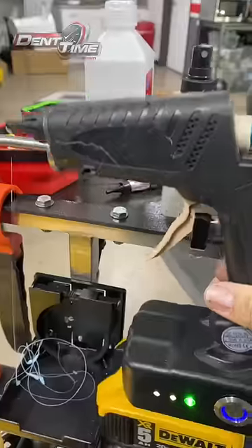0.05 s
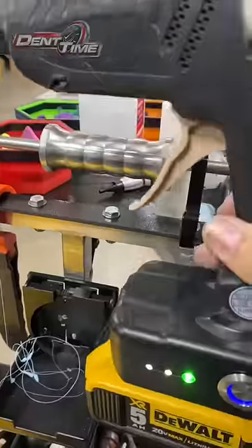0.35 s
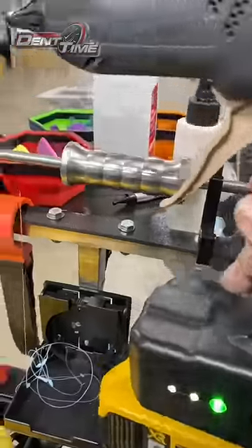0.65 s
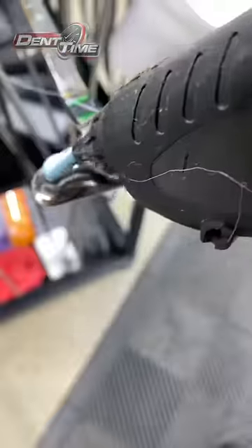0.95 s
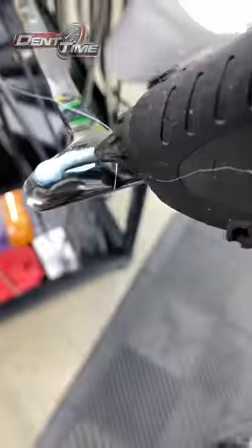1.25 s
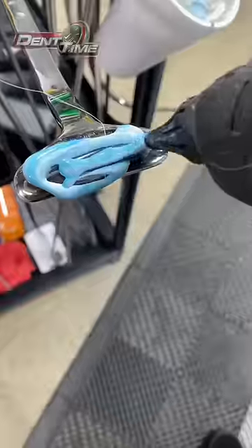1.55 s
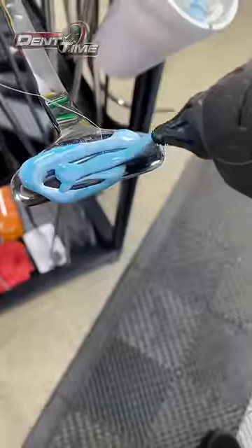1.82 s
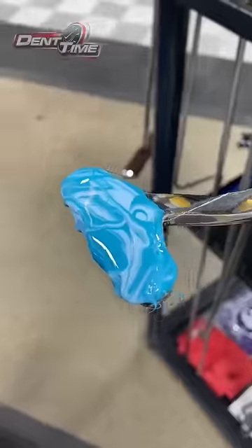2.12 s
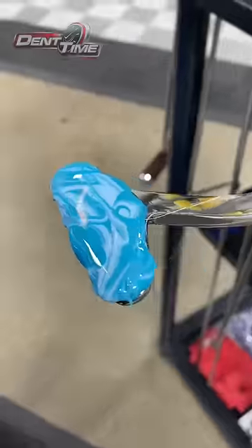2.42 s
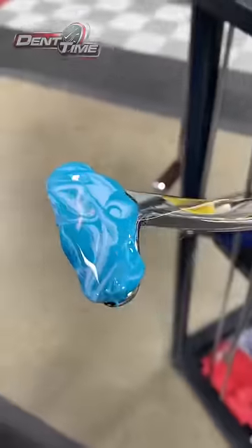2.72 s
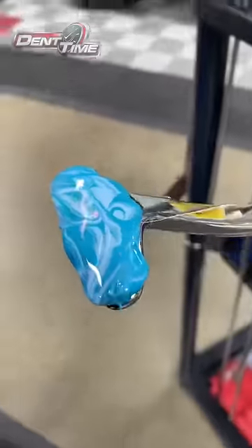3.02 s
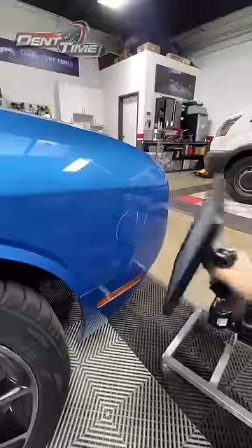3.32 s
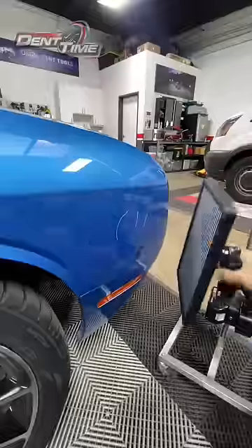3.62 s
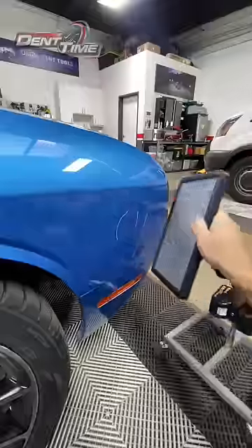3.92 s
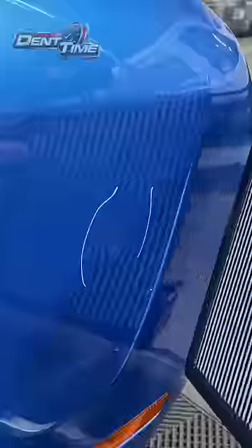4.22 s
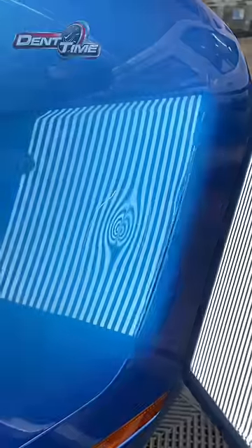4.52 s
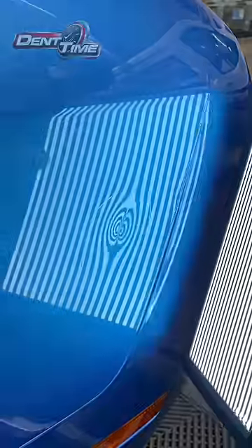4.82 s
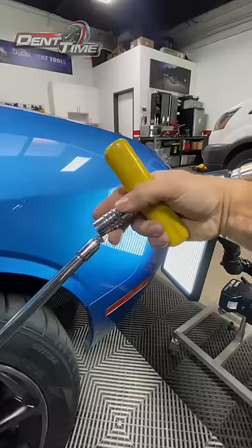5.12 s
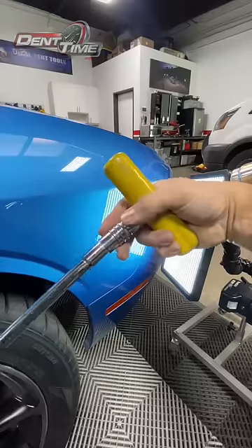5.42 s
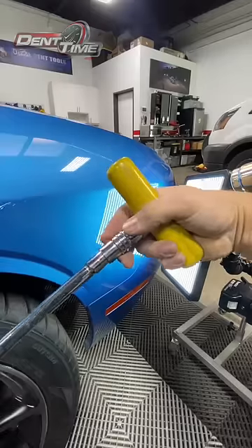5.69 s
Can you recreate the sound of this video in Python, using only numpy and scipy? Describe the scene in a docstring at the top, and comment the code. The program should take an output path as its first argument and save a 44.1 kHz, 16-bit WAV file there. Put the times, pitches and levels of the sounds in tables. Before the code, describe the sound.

A close, hollow knock and a few trigger ticks come from a plastic glue gun being handled, over the low rumble of a workshop hall. After a pause, a lamp stand is adjusted some way off, creaking, squeaking briefly and clacking as it settles. The hum then grows a little, and a steel ratchet handle near the microphone gives three loud, ringing snaps among lighter ticks.

```python
"""Dent repair in a humming workshop.

Ventilation and machines fill a large hall. Close to the microphone a glue gun is picked up and clicks.
Farther off, a lamp stand's stiff joint sticks and slips, creaking and squealing, and loose parts clack.
Then, close again, the pawl in a push rod's ratchet snaps through its notches and rings the steel handle."""
import sys
import numpy as np
from scipy import signal
from scipy.fft import rfft, irfft, next_fast_len
from scipy.io import wavfile
from scipy.ndimage import map_coordinates

SR = 44100
rng = np.random.default_rng(int(sys.argv[2]) if len(sys.argv) > 2 else 0)


def to_wav(s):
    """Save 16-bit WAV."""
    ch = np.atleast_2d(s).T  # columns
    pcm = np.round(np.clip(ch, -1, 1) * 32767)  # PCM
    wavfile.write(sys.argv[1], SR, pcm.astype(np.int16))


N = 262395
TIME = np.arange(N) / SR
AGE = np.arange(SR // 3) / SR  # seconds since a blow


def amp(db):
    """Decibels to gain."""
    return 10 ** (np.asarray(db) / 20)


def unit(x):
    """Scale to rms 1."""
    return x / np.sqrt(np.mean(x ** 2) + 1e-20)


def unit_energy(x):
    """Scale to energy 1."""
    return x / np.linalg.norm(x)


def along(points, hz):
    """Read (frequency [Hz], value) points on a log axis."""
    freqs, values = np.transpose(points)
    return np.interp(np.log(hz + 1), np.log(freqs + 1), values)


def curves(rows):
    """One value per sample for each column after the time."""
    times, *columns = np.transpose(rows)
    return [np.interp(TIME, times, column) for column in columns]


def fade(t, t60):
    """Exponential decay by 60 dB in t60 seconds."""
    return np.exp(-np.log(1000) * t / t60)


def gate(start, end, edge=.004):
    """On between two times, with soft edges."""
    return np.clip(np.minimum(TIME - start, end - TIME) / edge + .5, 0, 1)


def swells(rows):
    """Gain of smooth swells given as (time [s], half length [s], level [dB])."""
    return sum(amp(db) * np.exp(-((TIME - s) / width) ** 2) for s, width, db in rows)


def wobble(rate):
    """A smooth random curve, rate knots a second."""
    return map_coordinates(rng.standard_normal(1024), [TIME * rate], mode="wrap")


def noise(spectrum):
    """Coloured noise of rms 1."""
    size = next_fast_len(N)
    gain = amp(along(spectrum, np.fft.rfftfreq(size, 1 / SR)))
    return unit(irfft(rfft(rng.standard_normal(size)) * gain, size)[:N])


def through(x, response):
    """Convolve, keeping the length."""
    return signal.fftconvolve(x, response)[:len(x)]


def colour(x, spectrum, size=1024):
    """Causal filter with the given spectrum and unit energy."""
    gain = amp(along(spectrum, np.fft.rfftfreq(size, 1 / SR)))
    cepstrum = irfft(np.log(gain))
    cepstrum[1:size // 2] *= 2  # fold to minimum phase
    cepstrum[size // 2 + 1:] = 0
    return through(x, unit_energy(irfft(np.exp(rfft(cepstrum)))))


def high_pass(x, hz):
    """Roll off the bass below hz."""
    return signal.sosfilt(signal.butter(2, hz, "highpass", fs=SR, output="sos"), x)


def add(track, s, sound):
    """Mix a sound into the track at time s."""
    part = track[round(s * SR):][:len(sound)]
    part += sound[:len(part)]


def ring(modes, pitch=1, scatter_db=2):
    """One blow on a set of modes, their strengths scattered at random; peak 1."""
    hz, db, t60 = np.transpose(modes)[:, :, None]
    strength = amp(db + scatter_db * rng.standard_normal(hz.shape)) * rng.choice([-1, 1], hz.shape)
    ringing = np.sum(strength * np.sin(2 * np.pi * hz * pitch * AGE) * fade(AGE, t60), axis=0)
    return ringing / np.abs(ringing).max()


def crack(spectrum, t60):
    """A blow on countless close, quickly dying modes; peak about 1."""
    return colour(rng.standard_normal(len(AGE)) * fade(AGE, t60), spectrum) / 2


# Moments when the hall's tail stops short; the last two bound the drone: (time [s])
BREAKS = [0.775, 4.102, 5.04, 5.81]
# The rush of air sinks for a while: (time [s], relative level [dB])
AIR_LULL = [(0, 0.5), (4.3, 0), (4.6, -2.5), (5.0, -1), (5.3, -1.5), (5.95, 2)]
# Spectra of vent rumble, rushing air and the drone beside the car: (frequency [Hz], relative level [dB])
RUMBLE_SPECTRUM = [(25, -46), (38, -16.5), (54, -1.5), (81, 4.5), (115, 2.5), (150, -1.5), (227, -7),
                   (314, -10), (400, -16), (880, -55)]
AIR_SPECTRUM = [(90, -30), (160, -9.5), (270, -7), (400, -12.5), (630, -10), (1000, -11), (1550, -18.5),
                (2000, -27.5), (2600, -37.5), (3500, -41), (6000, -47), (11000, -53), (16000, -55)]
DRONE_SPECTRUM = [(30, -43), (48, -10), (107, 6.5), (162, -4), (270, -2), (380, -9), (480, 0.5),
                  (650, -17.5), (1200, -40.5)]
# Machine hum around the hall: (start [s], end [s], frequency [Hz], level [dB])
HUM_TONES = [(5.04, 5.81, 53.8, -38.5), (5.04, 5.813, 102.6, -33.5), (5.042, 5.527, 199.5, -39),
             (5.046, 5.272, 253, -41), (5.042, 5.24, 281, -44.5), (5.043, 5.54, 334.4, -44.5),
             (5.272, 5.81, 490, -48.5), (5.809, 6.0, 75, -29.5), (1.404, 2.2, 72, -47.5),
             (0.91, 4.6, 83.5, -52.5)]


def workshop(vent_db=-44.5, beside_car_db=3, air_db=-51, drone_db=-45):
    """Room tone: ventilation rumbles and rushes; machines hum, most strongly beside the car."""
    beside_car = TIME > BREAKS[2]
    rumble = amp(vent_db + beside_car_db * beside_car + wobble(9.4)) * noise(RUMBLE_SPECTRUM)
    air = amp(air_db + curves(AIR_LULL)[0] + 0.31 * wobble(4.94)) * noise(AIR_SPECTRUM)
    drone = amp(drone_db) * gate(BREAKS[2], BREAKS[3]) * noise(DRONE_SPECTRUM)
    hum = np.zeros(N)
    for start, end, hz, db in HUM_TONES:
        level = gate(start, end) * amp(db + wobble(8))
        hum += level * np.sin(2 * np.pi * hz * TIME + 0.12 * wobble(5.3))
    return rumble + air + drone + hum


# Reverberation of the hall: (frequency [Hz], t60 [s])
HALL_DECAY = [(200, 1), (1000, 0.78), (4000, 0.79), (8000, 0.36), (15000, 0.4)]


def hall(x, block=4096):
    """The hall's tail: new for each moment, as things move, and stopping short at each break."""
    out = np.zeros(N)
    edges = [0] + [round(s * SR) for s in BREAKS] + [N]
    for start, end in zip(edges, edges[1:]):
        for at in range(start, end, block):
            hz, t, bands = signal.stft(rng.standard_normal(SR * 2 // 3), SR, nperseg=256)
            dying = bands * fade(t, along(HALL_DECAY, hz)[:, None])
            tail = unit_energy(signal.istft(dying, SR, nperseg=256)[1])
            echo = signal.fftconvolve(x[at:min(at + block, end)], tail)
            add(out, at / SR, echo[:end - at])
    return out


# Shifts of grip: (time [s], half length [s], level [dB])
GRIP_SHIFTS = [(1.892, 0.052, -55.5), (3.95, 0.037, -47), (4.315, 0.077, -53), (4.615, 0.077, -59.5)]
# Rustle of the fingers: (frequency [Hz], relative level [dB])
GRIP_SPECTRUM = [(800, 0), (2000, -7.5), (3100, 0.5), (4100, -10.5), (5000, -11), (7500, -12.5),
                 (11000, -13), (16000, -19)]


def finger_rustle(grain_db=6.5):
    """Close to the microphone, fingers shift their grip: short gritty swells."""
    return swells(GRIP_SHIFTS) * unit(amp(grain_db * wobble(300))) * noise(GRIP_SPECTRUM)


# Strokes of a hand over the gun: (time [s], half length [s], level [dB])
HAND_STROKES = [(0.172, 0.094, -54.5), (0.32, .027, -56.5), (0.465, 0.055, -53.5), (0.61, 0.066, -60.5),
                (0.76, 0.032, -51.5)]
# Spectra of skin on the casing and of the trigger's tick: (frequency [Hz], relative level [dB])
SKIN_SPECTRUM = [(900, 2), (2000, 4), (4000, 2), (7000, -0.5), (11000, -5.5), (16000, -6.5)]
TRIGGER_SPECTRUM = [(500, -7), (2500, -2), (5000, -9), (8500, -4), (11500, -1.5), (14000, -18), (16000, -9)]
# Knocks on the casing and clicks of the trigger: (time [s], tick [dB], ring [dB], pitch [ratio])
CASING_KNOCKS = [(0.0591, -19, -22, 0.98), (0.0667, -24.5, -26.5, 0.93), (0.085, -43, -28, 0.347)]
TRIGGER_CLICKS = [(1.0335, -55, -74, 1), (1.236, -52, -70, 0.88), (1.4212, -52.5, -57, 1.8),
                  (1.829, -43, -41, 1.03), (1.8645, -28.5, -44, 1.73), (1.932, -22, -21.5, 0.99),
                  (1.9356, -29, -20, 1.01), (1.987, -50, -54, 2.1)]
# Modes of the casing and the plastic shell: (frequency [Hz], relative level [dB], t60 [s])
CASING_MODES = [(606, -5, .02), (746, -1.5, 0.039), (1250, -5, 0.018), (1790, 4.5, 0.039),
                (2060, -7, 0.014), (2740, -2.5, 0.021)]
SHELL_MODES = [(770, -8.5, 0.017), (1060, -10, 0.0046), (1465, -1, 0.025), (1670, -9, 0.033),
               (1790, -7.5, 0.021), (2340, -15, 0.0096)]


def glue_gun():
    """Close up, the lifted gun knocks, a hand slides over it, and the trigger ticks in its hollow shell."""
    out = gate(0, BREAKS[0]) * swells(HAND_STROKES) * amp(1.2 * wobble(139.7)) * noise(SKIN_SPECTRUM)
    for s, tick_db, ring_db, pitch in CASING_KNOCKS:
        tick = amp(tick_db) * crack(SKIN_SPECTRUM, t60=0.013)
        add(out, s, tick + amp(ring_db) * ring(CASING_MODES, pitch))
    for s, tick_db, ring_db, pitch in TRIGGER_CLICKS:
        tick = amp(tick_db) * crack(TRIGGER_SPECTRUM, t60=0.0095)
        add(out, s, tick + amp(ring_db) * ring(SHELL_MODES, pitch))
    return out


# Modes of the lamp panel, steel tubes and pole: (frequency [Hz], relative level [dB], t60 [s])
PANEL_MODES = [(286, -22.5, 0.11), (453.6, -15.5, 0.076), (600, -3, 0.021), (854, 0.5, 0.0099),
               (1034, 0, 0.022), (1405, -3, 0.034), (1626, 0.5, 0.016), (2040, 2, 0.0088)]
TUBE_MODES = [(3481, -1, .1), (4488, -3, .1), (4705, -2, .1), (5955, -3, .1), (7630, -2, .08),
              (9365, -1, .12), (11610, -3, .1)]
POLE_MODES = [(266.3, -1, 0.3), (281, 0, .15)]
PANEL_LOW_HZ = 330  # the small panel radiates little below this
# Colour of the creak: (frequency [Hz], relative level [dB])
JOINT_SPECTRUM = [(200, -23.5), (900, -11), (2200, -1.5), (4400, 0.5), (5600, -0.5), (8500, 1),
                  (12000, -0.5), (15500, -1.5)]
# Pushes on the stiff joint: (time [s], length [s], level [dB], panel boom relative to level [dB])
JOINT_PUSHES = [(3.2168, .035, -15, -9.5), (3.255, 0.067, -25, -23.5), (3.303, .064, -19.5, -11),
                (3.370, .034, -16.5, -12), (3.406, 0.051, -28.5, -5.5), (3.467, 0.039, -19.5, -14.5),
                (3.682, 0.016, -16.5, -10), (3.698, 0.15, -48.5, -7.5)]
# The joint catches with single clicks as it tightens: (time [s], level [dB])
JOINT_CATCHES = [(3.606, -31), (3.6162, -26.5), (3.632, -27.5), (3.64, -22), (3.66, -20.5), (3.6651, -18.5),
                 (3.672, -19.5), (3.77, -32)]
CATCH_S, CATCH_BOOM_DB = 0.0033, -10.5  # length of a catch, and its boom in the panel
JUDDER_HZ, JUDDER_DB = 170, 1.5  # how fast and how far the friction wavers
BREAKAWAY_DB, BREAKAWAY_S = 1, .004  # friction is greatest as the joint breaks loose, and soon drops


def lamp_creak(slip_hz=1196, jitter=.25, scatter_db=3, frame_db=5, tubes_db=-17, pole_db=-36):
    """Stick-slip, farther off: uneven trains of slips shake the frame, boom in the panel, hum in the pole."""
    steel, panel, pole = np.zeros((3, N))
    friction = amp(JUDDER_DB * wobble(JUDDER_HZ))
    catches = [(s, CATCH_S, db, CATCH_BOOM_DB) for s, db in JOINT_CATCHES]
    for s, length, db, boom_db in JOINT_PUSHES + catches:
        gaps, sizes, sides = rng.standard_normal((3, 200))
        when = np.cumsum(np.exp(jitter * gaps)) / slip_hz
        when -= when[0]
        live = when < length
        at = (when[live] * SR).astype(int)
        breakaway_db = BREAKAWAY_DB * np.exp(-when[live] / BREAKAWAY_S)
        slips = amp(scatter_db * sizes[live] + breakaway_db) * friction[round(s * SR) + at]
        train = -amp(db) * unit_energy(np.bincount(at, slips)) * np.sqrt(length * SR)
        # the contact moves, so each burst rings other modes
        frame = amp(frame_db) * unit_energy(crack(JOINT_SPECTRUM, t60=0.019))
        frame[0] += 1  # each slip is heard directly before the frame rings
        add(steel, s, signal.fftconvolve(train, unit_energy(frame)))
        # the stand is pushed either way
        shoves = unit_energy(np.bincount(at, slips * sides[live])) * np.sqrt(length * SR)
        boom = signal.fftconvolve(shoves, unit_energy(ring(PANEL_MODES, scatter_db=0)))
        add(panel, s, amp(db + boom_db) * boom)
        add(pole, s, amp(pole_db + 0.25 * db) * shoves)
    tubes = amp(tubes_db) * through(steel, unit_energy(ring(TUBE_MODES)))
    pole_hum = through(pole, unit_energy(ring(POLE_MODES)))
    return colour(steel, JOINT_SPECTRUM) + tubes + high_pass(panel, PANEL_LOW_HZ) + pole_hum


# Course of the joint's squeal: (time [s], frequency [Hz], relative level [dB])
SQUEAL_PATH = [(3.253, 6920, -41.5), (3.256, 7480, -14.5), (3.263, 7900, -23.5), (3.271, 8230, -22),
               (3.279, 7850, -23.5), (3.292, 7240, -30)]


def lamp_squeal(low_start=3.268, low_end=3.295, low_hz=3150, rise_hz_per_s=13000, low_db=-28):
    """For a moment the joint slides smoothly and sings, with a second, lower squeak rising under it."""
    hz, db = curves(SQUEAL_PATH)
    phase = 2 * np.pi * np.cumsum(hz * (1 + 0.037 * wobble(900))) / SR
    level = gate(SQUEAL_PATH[0][0], SQUEAL_PATH[-1][0]) * amp(db + 3.5)
    high = level * (np.sin(phase) + np.sin(2 * phase) / np.pi)
    glide_hz = low_hz + rise_hz_per_s * np.maximum(TIME - low_start, 0)
    low_phase = 2 * np.pi * np.cumsum(glide_hz) / SR + wobble(450)
    return high + gate(low_start, low_end) * amp(low_db) * np.sin(low_phase)


# Clacks of the stand: (time [s], steel [dB], panel [dB], steel's low corner [Hz], steel's t60 [s])
STAND_CLACKS = [(3.216, -12, -18, 895, 0.026), (3.238, -30, -10.5, 900, .03),
                (3.8184, -21, -24, 1005, 0.034), (3.923, -29.5, -33, 4800, 0.017),
                (3.975, -42, -50, 6050, 0.062), (4.041, -11.5, -16.5, 900, .038),
                (4.2022, -22, -66, 5760, 0.057), (4.5508, -47.5, -54, 2495, 0.053),
                (4.6183, -54, -50, 2000, 0.027), (4.6358, -55, -36.5, 1950, 0.025)]


def stand_clacks():
    """Loose parts knock together as the lamp swings and settles; steel rings over the panel's boom."""
    out = np.zeros(N)
    for s, steel_db, panel_db, low_hz, t60 in STAND_CLACKS:
        steel = crack([(low_hz / 2, -22), (low_hz, 0), (11500, -1), (16000, -12)], t60)
        boom = high_pass(ring(PANEL_MODES), PANEL_LOW_HZ)
        add(out, s, amp(steel_db) * steel + amp(panel_db) * boom)
    return out


# Modes of the pawl's squeak and the steel handle: (frequency [Hz], relative level [dB], t60 [s])
SQUEAK_MODES = [(1270, 0, 0.015), (1650, -4.5, 0.02), (2303, -1.5, 0.036), (3040, -1.5, 0.049),
                (3650, -10.5, 0.05), (4440, -8, 0.04), (5480, -0.5, 0.023), (5670, -3.5, .03),
                (6200, -9.5, 0.024), (6640, -6, 0.022)]
HANDLE_MODES = [(1079, -18.5, 0.018), (1750, -11.5, 0.032), (1960, -19.5, 0.052), (2300, -2.5, 0.036),
                (2422, -3.5, 0.048), (2695, -7, 0.045), (2906, -0.5, 0.037), (3530, 1, 0.046),
                (3660, -0.5, 0.057), (4380, -10.5, 0.0467), (5420, 0, 0.025), (5580, -0.5, 0.031),
                (6050, 0, 0.035), (6330, 0, 0.013), (7730, -13, .022), (8330, -12.5, 0.045),
                (9020, -11.5, 0.019), (14300, -29.5, 0.024), (15060, -24, .03)]
# Crack of the pawl on a tooth: (frequency [Hz], relative level [dB])
PAWL_SPECTRUM = [(300, -32.5), (1200, -14), (2500, 1.5), (6000, 0.5), (9000, -4), (12700, -16), (14100, 4),
                 (16000, -8)]
# The pawl slides up a tooth: (time [s], length [s], level [dB])
PAWL_SLIDES = [(5.045, 0.028, -44.5), (5.089, .035, -55), (5.122, .084, -45), (5.471, 0.064, -36),
               (5.618, 0.14, -56)]
# It rides over the crest with a double tick: (time [s], first tick [dB], second tick [dB])
PAWL_TICKS = [(5.0458, -30.5, -38), (5.2362, -21, -15.5), (5.4745, -19.5, -12.5), (5.5076, -22, -15.5),
              (5.64, -33.5, -36), (5.7638, -39, -48.5)]
# It snaps into a notch: (time [s], ring [dB], crack [dB], rebound relative to the snap [dB])
PAWL_SNAPS = [(5.2631, -4, -10, -2.5), (5.4855, -6.5, -12.5, -17), (5.519, -6, -1.5, -11.5)]


def ratchet(grit_db=1.0, scrape_db=-17, tick_gap_s=.0089, tick_ring_db=1.5, rebound_s=0.005):
    """Close up, the pawl squeaks up a tooth, ticks over it, snaps down and rebounds, ringing the handle."""
    grit = unit(amp(grit_db * wobble(180)) * rng.standard_normal(N))
    sliding = grit * sum(amp(db) * gate(s, s + length, edge=0.015) for s, length, db in PAWL_SLIDES)
    squeak = through(sliding, unit_energy(ring(SQUEAK_MODES, scatter_db=0)))
    out = squeak + amp(scrape_db) * colour(sliding, PAWL_SPECTRUM)
    contacts = []
    for s, first_db, second_db in PAWL_TICKS:
        contacts.append((s, first_db + tick_ring_db, first_db))
        contacts.append((s + tick_gap_s, second_db + tick_ring_db, second_db))
    for s, ring_db, crack_db, rebound_db in PAWL_SNAPS:
        contacts.append((s, ring_db, crack_db))
        contacts.append((s + rebound_s, ring_db + rebound_db, crack_db + rebound_db))
    for s, ring_db, crack_db in contacts:
        pitch = 1 + 0.0027 * rng.standard_normal()  # the changing load detunes the handle a little
        handle = amp(ring_db) * ring(HANDLE_MODES, pitch)
        add(out, s, handle + amp(crack_db) * crack(PAWL_SPECTRUM, t60=0.025))
    return out


def scene():
    """All sources in the one hall; the farther from the microphone, the more tail."""
    gun, handle = glue_gun() + finger_rustle(), ratchet()
    creak, clacks = lamp_creak() + lamp_squeal(), stand_clacks()
    send = amp(-21) * gun + amp(-21.5) * handle + amp(-13.5) * creak + amp(-11.0) * clacks
    return (gun + handle + creak + clacks + hall(send) + workshop())[None]


def record(dry, ceiling=.85, top_hz=15850):
    """A phone's mono microphone rounds off the highest peaks and keeps nothing above its band limit."""
    rounded = dry / (1 + np.abs(dry / ceiling) ** 6) ** (1 / 6)
    size = next_fast_len(N + SR // 4)
    passband = np.clip((top_hz - np.fft.rfftfreq(size, 1 / SR)) / 300 + .5, 0, 1)
    return irfft(rfft(rounded, size) * passband, size)[..., :N]


dry = scene()
out = record(dry)
to_wav(out)
```